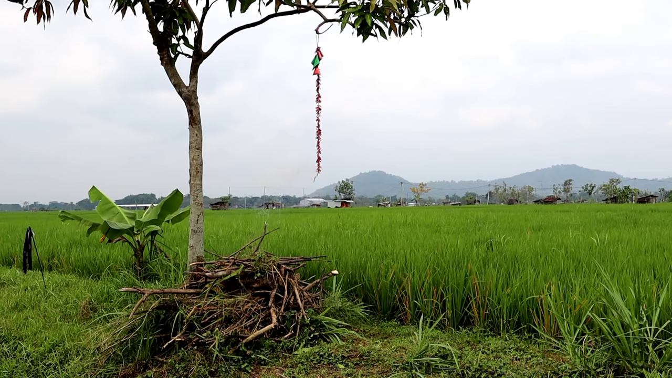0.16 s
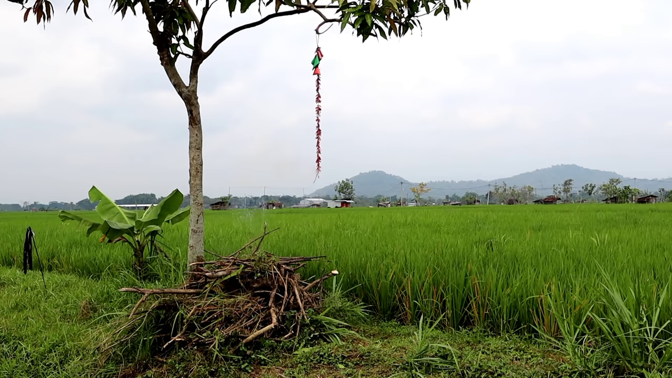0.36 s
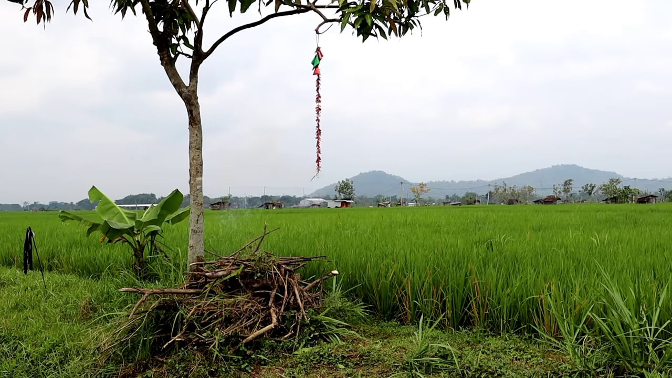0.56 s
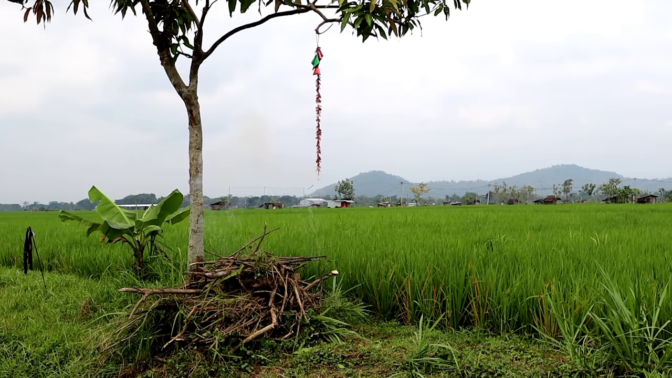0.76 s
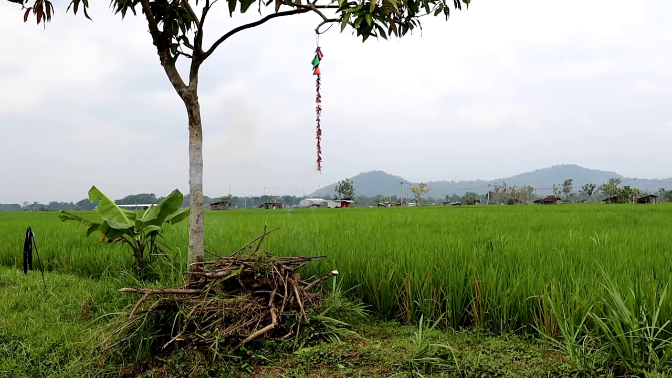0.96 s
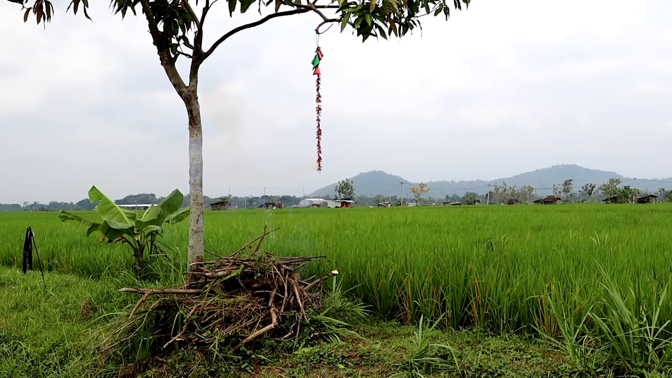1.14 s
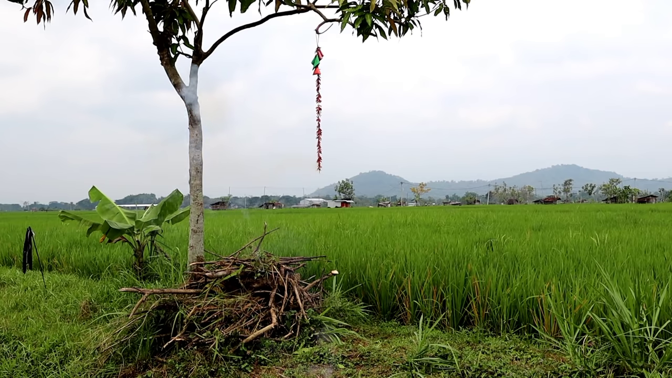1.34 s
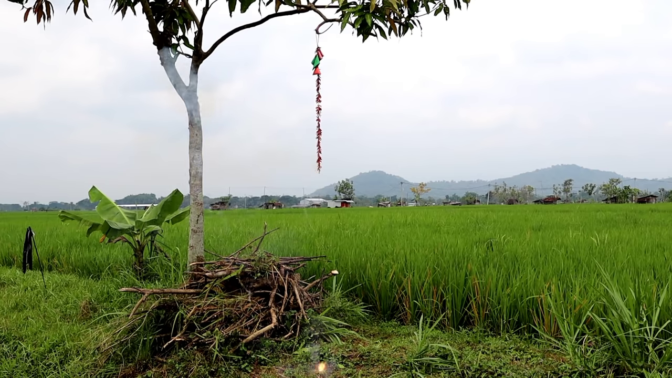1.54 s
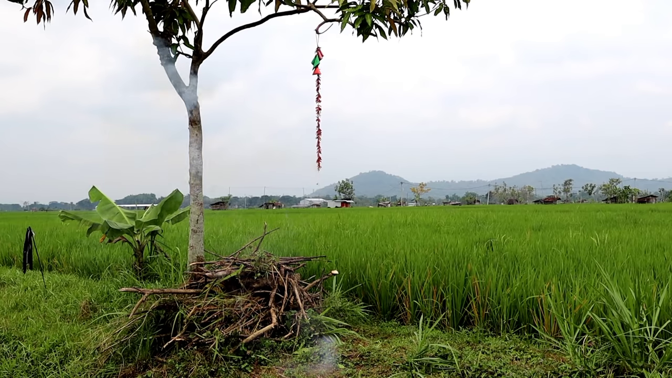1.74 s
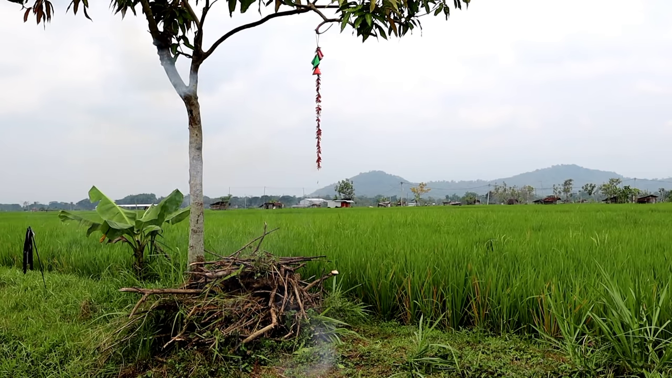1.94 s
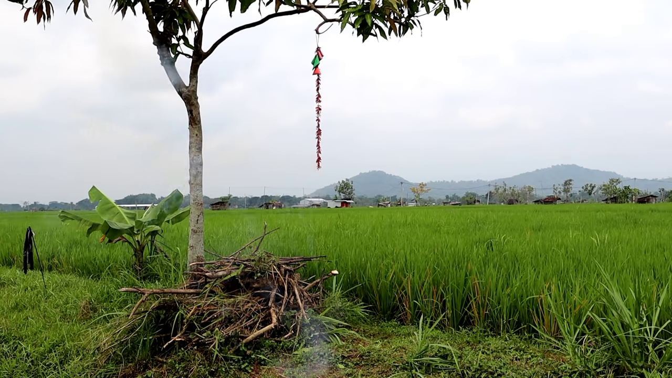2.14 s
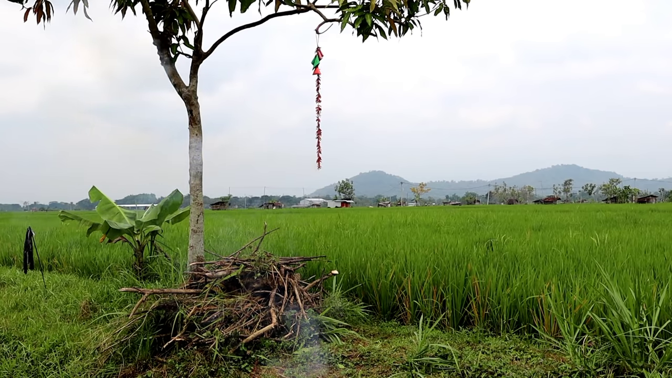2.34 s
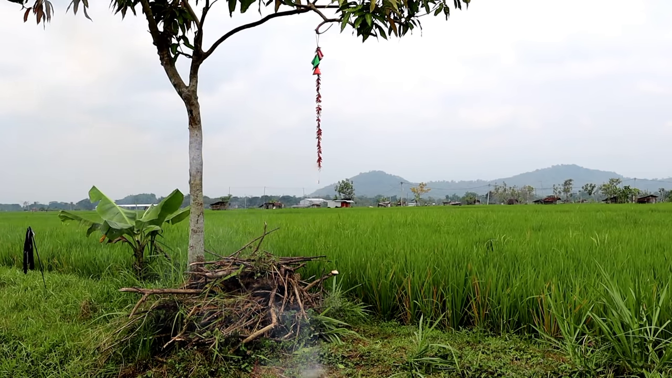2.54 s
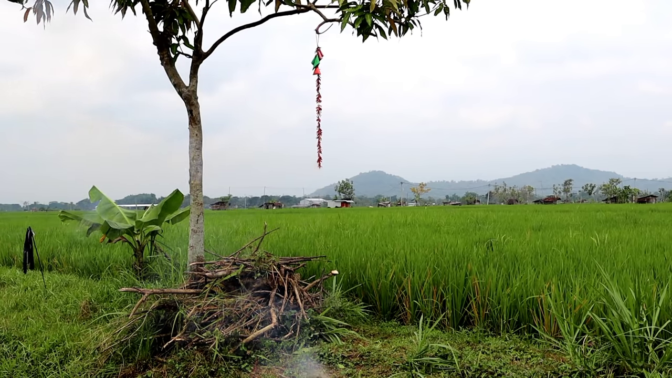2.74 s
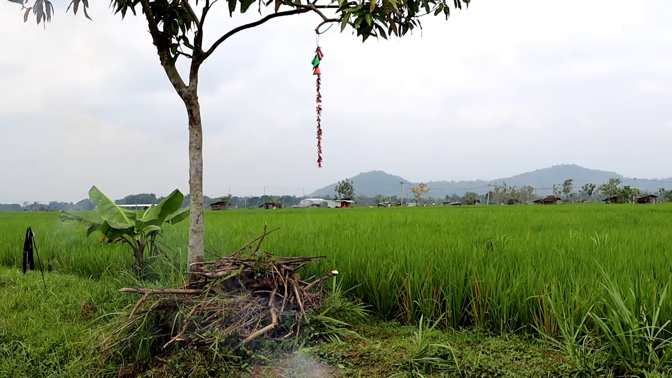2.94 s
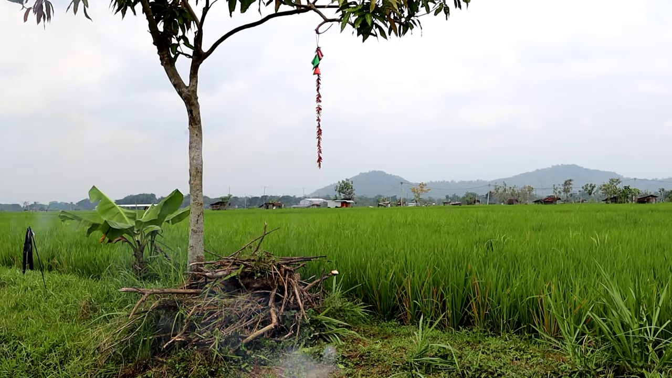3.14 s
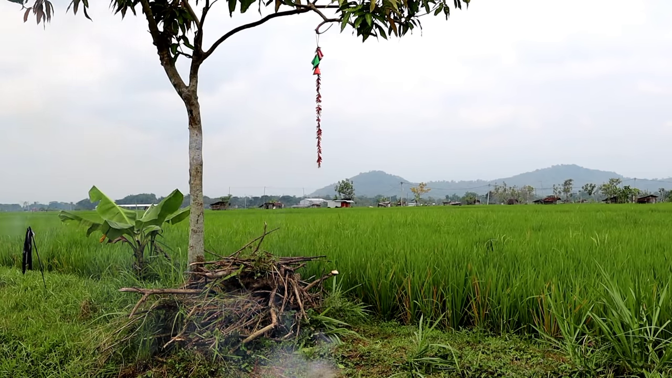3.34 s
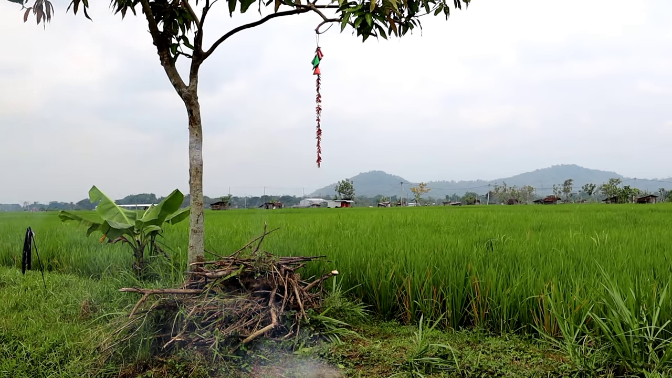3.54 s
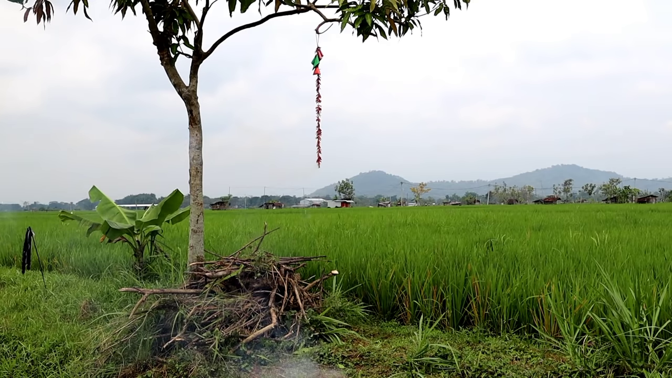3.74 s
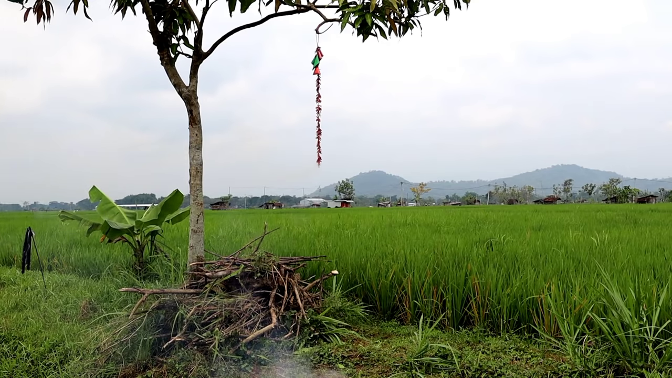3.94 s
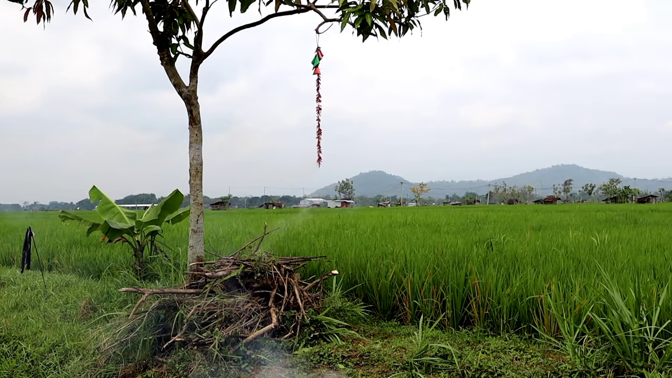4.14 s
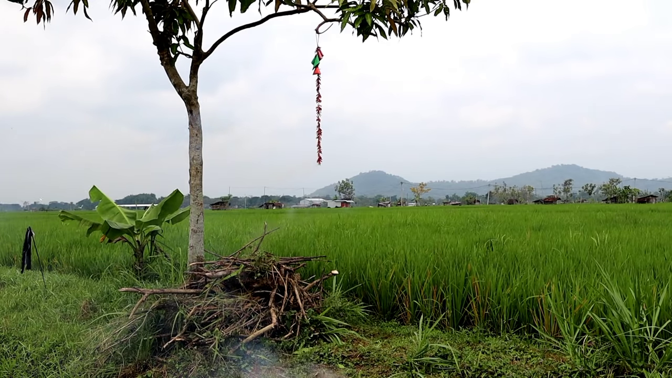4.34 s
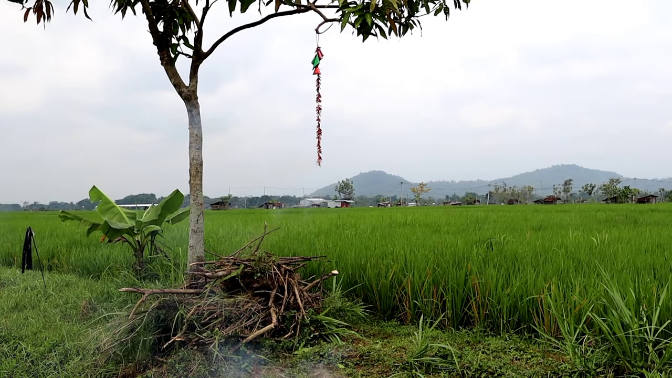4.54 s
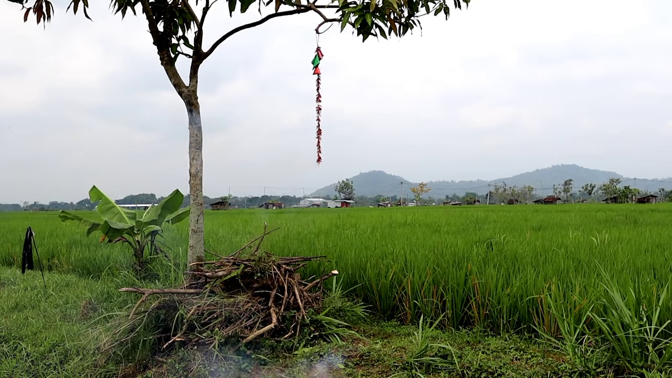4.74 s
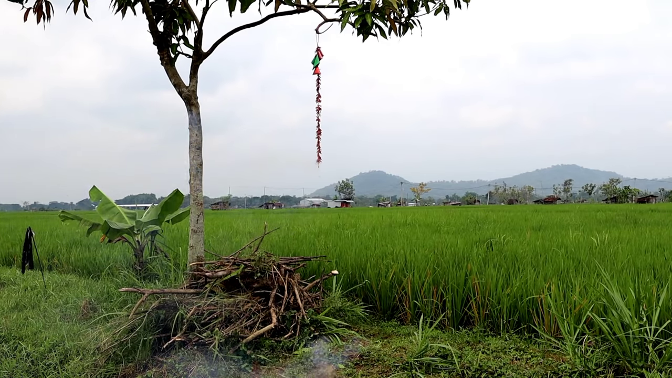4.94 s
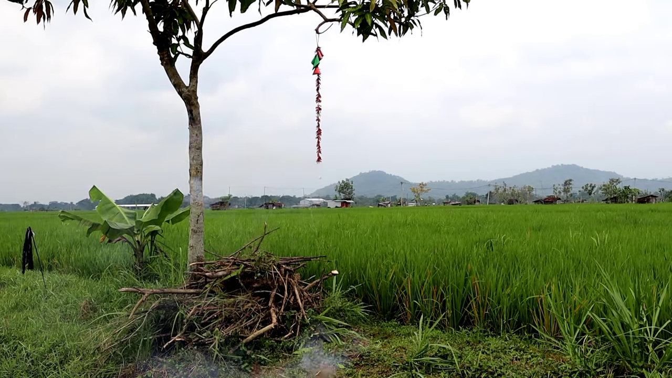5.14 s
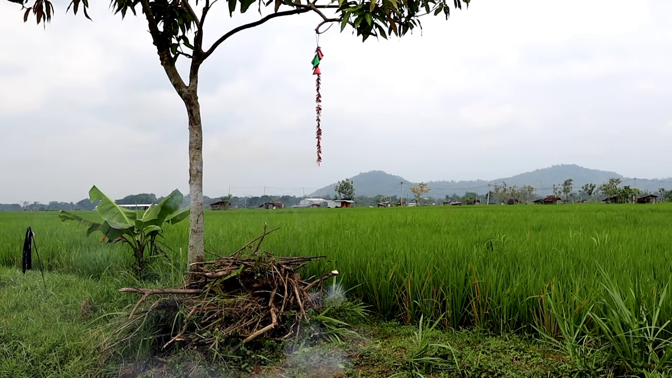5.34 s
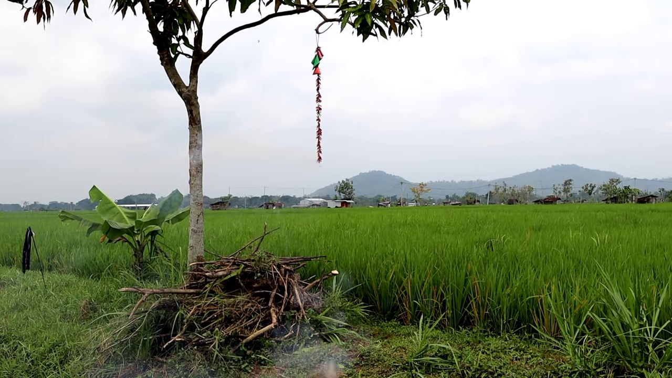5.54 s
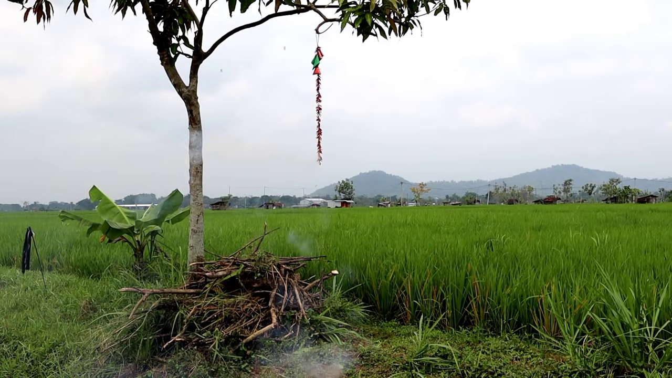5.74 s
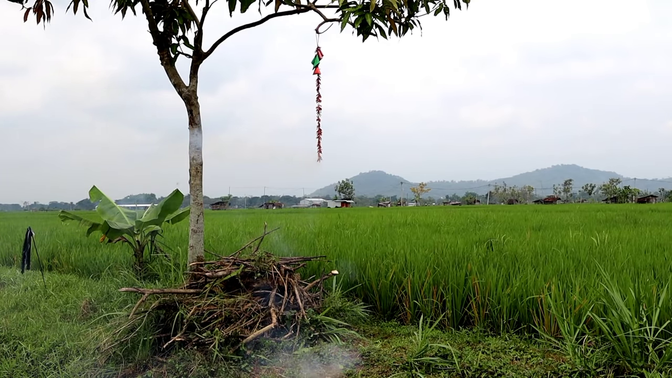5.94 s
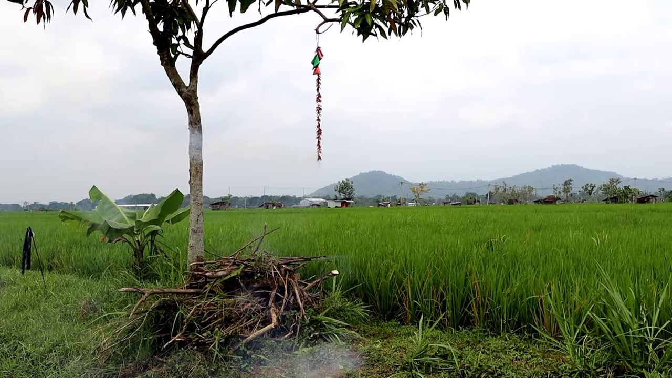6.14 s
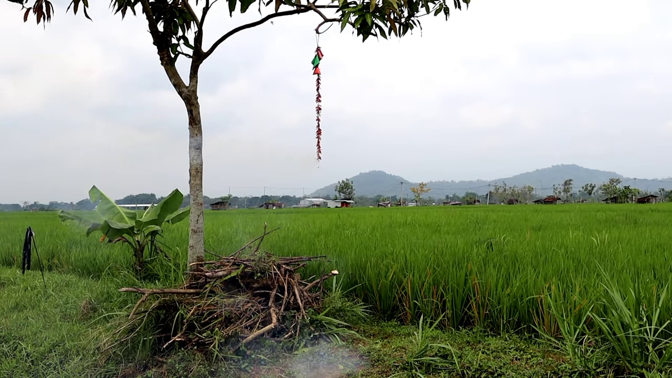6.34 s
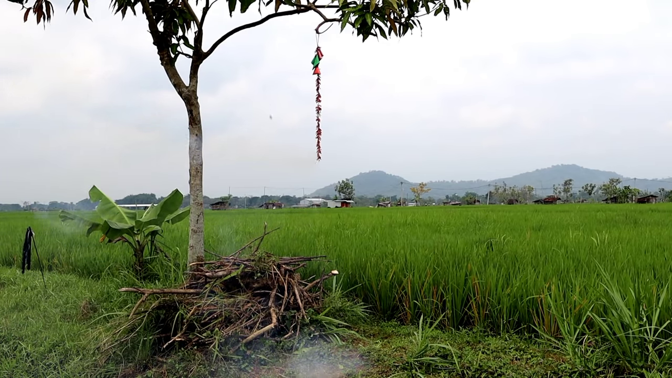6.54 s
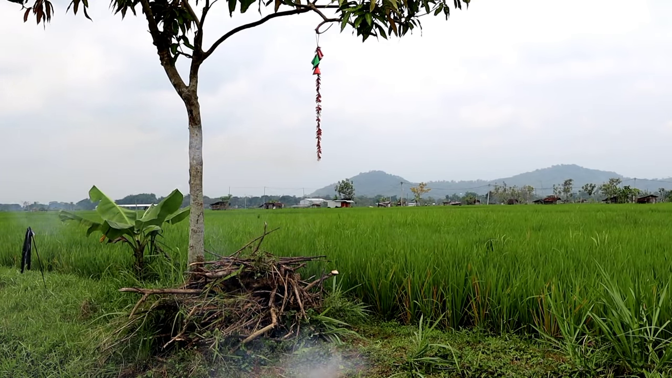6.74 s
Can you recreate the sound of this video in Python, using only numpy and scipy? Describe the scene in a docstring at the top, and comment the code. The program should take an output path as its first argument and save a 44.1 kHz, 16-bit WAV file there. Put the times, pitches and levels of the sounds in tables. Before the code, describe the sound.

A fuse hisses and sputters at a field's edge, then firecrackers burst in an irregular run of sharp, clipped cracks with short outdoor echoes.

```python
"""At the edge of a field a string of firecrackers hangs from a tree, with a microphone within overload range.
The fuse, a fluttering jet of noise, hisses and sputters; then the crackers burst in an irregular run.
Each is a short shock wave with a ground bounce; the stronger ones clip the microphone. Shaped noise makes the
scatter in the brushwood, the roll over the field and the echoes from far trees and woods. Scraps of casing land,
and behind it all lie a low outdoor rumble and the soft chugs of a distant engine."""
import sys
import numpy as np
from scipy import signal
from scipy.fft import rfft, irfft
from scipy.io import wavfile
from scipy.ndimage import uniform_filter1d

SR = 44100
rng = np.random.default_rng(int(sys.argv[2]) if len(sys.argv) > 2 else 0)


def store_pcm(level_fs):
    """Save levels as 16-bit WAV."""
    pcm = np.round(np.clip(level_fs, -1, 1) * 32767).astype(np.int16)
    wavfile.write(sys.argv[1], SR, np.atleast_2d(pcm).T)


N = 303849  # samples

# One row a cracker, each bursting at its own height: start_s, shock_db (raw shock against overload),
# blast_ms, bounce_delay_ms, around_db (sent into the surroundings), bright_db, far_echo_db, thump_db
BURSTS = [(1.353, 33, 0.18, 1.05, 6, -1, -61.5, -17), (1.3795, 14, 0.211, 1.2, -9.5, 2.5, -35.5, -19.5),
          (1.5009, 28.5, 0.11, 0.98, 2.0, 5.5, -39.5, -29.0), (1.619, 22.0, 0.22, 1.06, 4.5, 6.5, -61, -10),
          (1.6695, 16.5, 0.146, 1.15, -1, 3.5, -67, -11), (1.6805, 12, 0.18, 1.25, -7, 4.5, -34.5, -4),
          (1.8472, 24, 0.57, 1.38, 3.5, -3.5, -39, -20), (2.1676, 24, 0.14, 1.15, 4.5, -4, -46.5, -2.5),
          (2.6578, 24.5, 0.17, 1.09, 7, -8, -37.5, -25.5), (2.6648, 12, 0.32, 1.1, -6, 3.5, -41, -24),
          (2.9527, 29, 0.111, 1.144, 5.5, 0, -42.5, -34.0), (3.1943, 21.5, 0.18, 1.07, 5, 5, -39, -33.5),
          (3.305, 22, 0.29, 1.15, 5.5, -18.5, -41.5, -26), (3.3148, 9, 0.27, 1.15, -10.5, 4, -42, -17),
          (3.5847, 14.0, 0.298, 1.05, 5, -8, -63.5, -4), (3.677, 22.5, 0.12, 1.76, 2, 6, -43.5, -4),
          (4.1336, 23.5, 0.25, 0.91, 0.5, -0.5, -38.5, -21),
          (4.1365, 14.5, 0.15, 2.16, -1.5, -2, -38, -15.5), (4.3448, 18.5, 0.2, 1.09, 4, -0.5, -43, -1.0),
          (4.5552, 13.5, 0.521, 1.15, 5, -8.5, -50.5, -29.5),
          (4.8061, 26.5, 0.073, 1.22, -0.5, 6, -62, -0.5), (4.8663, 19, 0.16, 1.16, 4.0, 1.5, -49, -8.5),
          (5.0188, 14.5, 0.26, 1.16, 3.5, -3.5, -69, -25),
          (5.2147, 17.5, 0.14, 1.18, -0.5, 1.5, -53, -18.5),
          (5.2382, 12.5, 0.16, 1.05, -7, 4.5, -61.5, -6.5),
          (5.3415, 20.0, 0.11, 1.85, 1.5, 4.5, -59.5, 2.5), (5.59, 17.5, 0.14, 1.95, -1.5, 0.5, -53, 7),
          (5.6203, 6, 0.175, 0.98, -10.5, 0.5, -70.5, -25),
          (5.665, 10.5, 0.089, 1.23, -10, 9.0, -83.5, -15.0), (5.7503, 23.5, 0.092, 2.27, 6.5, 0.0, -52, 4),
          (5.8273, 13.0, 0.17, 1.11, -3, 4.0, -64.5, -13.5),
          (6.0618, 11.5, 0.507, 1.128, -2.5, -10.0, -64, -44),
          (6.1165, -2.5, 0.12, 1.43, -21.0, 2.5, -77.5, -32),
          (6.1926, 6, 0.15, 2.17, -11.5, 1.5, -67.5, -30), (6.354, 13.5, 0.17, 1.25, 2.0, -0.5, -64.5, -47),
          (6.4365, 14.5, 0.14, 1.04, -3.5, 1, -56, -10.5), (6.4969, 20.5, 0.1, 1.18, -2.5, 0.5, -77.5, -41),
          (6.7671, 15.5, 0.14, 1.12, -5, 2.0, -64, -7.5), (6.8275, 11.5, 0.15, 1.25, -6, 8.5, -62.0, -9.5),
          (6.8859, 11.5, 0.33, 1.13, -0.0, -1, -57.0, -11)]


def amp(db):
    """Turns decibels into a gain."""
    return 10 ** (np.asarray(db) / 20)


def evened(x):
    """Scales a signal to rms 1."""
    return x / np.sqrt(np.mean(x ** 2) + 1e-20)


def read(points, hz):
    """Reads a spectrum joined by straight lines on a log-frequency axis."""
    point_hz, value = np.transpose(points)
    return np.interp(np.log(hz + 1), np.log(point_hz + 1), value)


def level(curve):
    """Turns a curve of time and dB into a gain for every sample."""
    return amp(np.interp(np.arange(N) / SR, *np.transpose(curve)))


def add(mix, start_s, sound):
    """Adds a sound to the mix at its start time, cut off at the mix's end."""
    part = mix[round(start_s * SR):][:len(sound)]
    part += sound[:len(part)]


def coloured(x, spectrum, bright_db=0):
    """Gives x a spectrum at rms 1, then lifts or lowers its treble with a shelf around 2 kHz."""
    hz = np.fft.rfftfreq(len(x), 1 / SR)
    shelf = hz ** 4 / (hz ** 4 + 2000 ** 4)
    shaped = rfft(x) * amp(read(spectrum, hz))
    # the scale is taken ahead of the shelf, so brightness leaves the low band's level alone
    scale = np.std(irfft(shaped, len(x)))
    return irfft(shaped * amp(bright_db * shelf), len(x)) / scale


def lumps(size, depth_db, span):
    """A gain that wanders at random by depth_db rms, smoothed over `span` samples."""
    return amp(depth_db * evened(uniform_filter1d(rng.standard_normal(size), size=span)))


def reflections(size, spectrum, bright_db, grain_db):
    """Noise as a mass of small echoes, their strengths scattered by grain_db."""
    strength = amp(grain_db * rng.standard_normal(size))
    return coloured(rng.standard_normal(size) * strength, spectrum, bright_db)


def crackers():
    """Sums every burst with its ground bounce, torn casing, scatter, roll, echoes and thump."""
    pile_s, pile_db = 0.0093, -30  # one firm reflection from the stick pile, against the blast
    # scatter and roll keep a fixed balance against what a cracker sends into the surroundings
    brush_db, roll_db = -27, -42.5
    out = np.zeros(N)
    puff = thump()
    for start, shock_db, blast_ms, bounce_ms, around_db, bright_db, far_db, thump_db in BURSTS:
        direct = amp(shock_db) * blast(blast_ms, bounce_ms)
        add(out, start, direct)
        add(out, start + pile_s, amp(pile_db) * direct)
        add(out, start, amp(shock_db) * casing())
        add(out, start, amp(brush_db + around_db) * brushwood(bright_db))
        add(out, start, amp(roll_db + around_db) * field(bright_db))
        add(out, start, amp(far_db) * far_trees(bright_db, blast_ms))
        add(out, start, amp(far_db) * woods())
        add(out, start, amp(thump_db) * puff)
    return out


def blast(blast_ms, bounce_ms, bounce_db=-5, low_cut_hz=310, damping=1.87, soil_hz=9000, size=2048):
    """A shock (1 - u) exp(-u) and its soil-dulled bounce, through the microphone's band, polarity inverted."""
    s = 2j * np.pi * np.fft.rfftfreq(size, 1 / SR)
    length, delay = blast_ms / 1000, bounce_ms / 1000  # s
    shock = -SR * s * length ** 2 / (1 + s * length) ** 2
    soil = 1 / (1 + s / (2 * np.pi * soil_hz))
    ground = 1 + amp(bounce_db) * np.exp(-s * delay) * soil
    # the shock front's treble limit falls as the blast gets longer: 6400 Hz at the usual 0.2 ms
    front_hz = 6400 * (0.2 / blast_ms) ** 0.33
    w = 2 * np.pi * low_cut_hz
    low_cut = s ** 2 / (s ** 2 + damping * w * s + w ** 2)
    front = 1 / (1 + s / (2 * np.pi * front_hz)) ** 2
    # the microphone's opening has a dip and two resonances
    port = 1 - 0.32 * band(s, 1634, quality=5.2)
    port = port + 0.5 * band(s, 3620, quality=9.3) + 0.66 * band(s, 5000, quality=3.3)
    return irfft(shock * ground * low_cut * front * port)[:size // 2]


def band(s, hz, quality):
    """A resonance of gain 1 at hz."""
    w = 2 * np.pi * hz
    return s * w / quality / (s ** 2 + s * w / quality + w ** 2)


def casing(tear_db=-27, decay_s=0.00028, size=512):
    """The paper tube tears apart: a burst of noise puts a ragged, bright edge on the shock."""
    # torn paper's spectrum: frequency_hz, level_db
    tear_spectrum = [(500, -21), (1500, -18.5), (3600, -11), (6000, -9.5), (9000, 14.5), (16000, -6)]
    t = np.arange(size) / SR
    return amp(tear_db) * coloured(rng.standard_normal(size), tear_spectrum) * np.exp(-t / decay_s)


def thump():
    """A low thump, less a weaker and slower swing back the other way."""
    puff_s, recovery_s, recovery_db = 0.0013, 0.0034, -27
    return push(puff_s) - amp(recovery_db) * push(recovery_s)


def push(length_s, size=4096):
    """A swing of pressure with a softened start and a weak rebound."""
    u = np.arange(size) / SR / length_s
    return (1 - np.exp(-u * 7)) * (1 - u) * np.exp(-u)


def brushwood(bright_db, size=4096):
    """Grass answers within milliseconds; the stick pile and the tree scatter for some 20 ms more."""
    # brushwood's spectrum: frequency_hz, level_db
    brush_spectrum = [(100, -8), (350, -13.5), (520, 2), (760, -5), (1200, -5), (1550, -3), (2000, -8.5),
                      (3000, -6.5), (3700, -0.5), (4300, -11.5), (5600, -10), (6800, -15.5), (11000, -18),
                      (16000, -27)]
    t = np.arange(size) / SR
    grass = amp(17.5) * np.exp(-t / 0.0018)
    sticks = amp(5.5) * np.exp(-t / 0.021) / np.sqrt(1 + (t / 0.019) ** 8)
    onset = 1 - np.exp(-t / 0.0021)
    return reflections(size, brush_spectrum, bright_db, grain_db=8.0) * (grass + sticks) * onset


def field(bright_db, size=16384):
    """The roll over the crop: uneven in the lows, while the treble dies sooner."""
    # the roll's spectrum: frequency_hz, level_db
    field_spectrum = [(80, -23.5), (200, -11), (400, -4.5), (800, -2), (1450, 0.5), (2000, -7.5),
                      (3000, -8), (3650, -6.5), (4300, -12.5), (5600, -10.5), (7000, -21), (16000, -26.5)]
    t = np.arange(size) / SR
    roll = reflections(size, field_spectrum, bright_db + 5.5, grain_db=4)
    low = signal.sosfilt(signal.butter(1, 2500, fs=SR, output="sos"), roll)
    # 60 dB down after 0.34 s in the lows and 0.22 s in the treble
    low_tail = low * lumps(size, depth_db=2, span=220) * amp(-60 * t / 0.34)
    treble_tail = (roll - low) * amp(-60 * t / 0.22)
    return amp(9) * (low_tail + treble_tail) * (1 - np.exp(-t / 0.0059))


def far_trees(bright_db, blast_ms, delay_s=0.095, spread=0.35, size=16384):
    """A dull echo from a line of trees, arriving in uneven slaps; a longer blast returns a deeper echo."""
    # the tree line's spectrum: frequency_hz, level_db
    far_spectrum = [(80, -20.5), (250, -12.5), (500, 0), (800, -2.5), (1400, -3.5), (2100, -10),
                    (3700, -5.5), (5500, -14), (7500, -9.5), (16000, -38)]
    t = (np.arange(size) + 1) / SR
    swell = np.exp(-(np.log(t / delay_s) / spread) ** 2 / 2)
    slaps = lumps(size, depth_db=3, span=250)
    trunk = 0.7 * np.exp(-((t - 0.115) / 0.00082) ** 2)  # one firm return stands out
    # the treble corner is 600 Hz for a 1 ms blast, higher for shorter ones
    depth = signal.butter(2, min(600 / blast_ms, SR / 3), fs=SR, output="sos")
    returns = reflections(size, far_spectrum, bright_db + 1.5, grain_db=5.5)
    echo = evened(signal.sosfilt(depth, returns) * slaps)
    return amp(1.0) * echo * (swell + trunk)


def woods(delay_s=0.21, spread=0.25, woods_db=-13.5, size=24000):
    """Distant woods across the field send back a late, low murmur in one slow swell."""
    # the woods' spectrum: frequency_hz, level_db
    woods_spectrum = [(100, -22), (250, -6.5), (400, 1.5), (600, -3), (1000, -19), (16000, -72)]
    t = (np.arange(size) + 1) / SR
    swell = np.exp(-(np.log(t / delay_s) / spread) ** 2 / 2)
    return amp(woods_db) * coloured(rng.standard_normal(size), woods_spectrum) * swell


def fuse():
    """A slightly fluttering jet of gas, as shaped noise, with its sputtering flares."""
    # the burning fuse's spectrum: frequency_hz, level_db
    fuse_spectrum = [(200, -24.5), (430, -10.5), (650, -3), (1100, -4), (1400, 1.5), (1750, -5),
                     (3100, -3.5), (3600, 0.5), (4500, -8.5), (5300, -1.5), (6300, -10), (8000, -12.5),
                     (11500, -10), (16000, -18)]
    # the hiss up to the first cracker and as it flares again, ahead of the fade: time_s, level_db
    hiss_curve = [(0, -56), (.3, -48), (.7, -47), (1.02, -44), (1.25, -49), (1.7, -51.5), (2.2, -48),
                  (3.1, -47.5)]
    jet = reflections(N, fuse_spectrum, 0, grain_db=0.0)
    hiss = jet * lumps(N, depth_db=0.97, span=900) * level(hiss_curve)
    return hiss + sputter()


def sputter(sparks_per_s=350):
    """Each flare is a fizz of fine random sparks with a quick, uneven run of spits."""
    # the fuse's flare-ups: start_s, length_s, level_db (ahead of the fade)
    flare_rows = [(.35, 0.14, -47), (0.61, 0.022, -46.5)]
    # spectrum of sparks and spits: frequency_hz, level_db
    spit_spectrum = [(200, -3), (600, -8), (1300, 2), (2200, -8), (4000, -13), (16000, -53)]
    rise_s, fall_s = 0.017, 0.069
    spit_gap_s, spit_db = 0.0115, 12  # mean gap; level above the flare's
    sparks = (rng.random(N) < sparks_per_s / SR) * rng.uniform(.4, 1, N)
    flame, spits, t = np.zeros(N), [], np.arange(SR) / SR
    for start, length, db in flare_rows:
        rise = np.minimum(t / rise_s, 1)
        fall = np.exp(-np.maximum(t - length, 0) / fall_s)
        add(flame, start - rise_s, amp(db) * rise * fall)
        gap, strength = rng.uniform(-1, 1, (2, 32))
        delays = np.cumsum(spit_gap_s * (1 + .5 * gap))
        for delay, z in zip(delays, strength):
            if delay < length:
                spits.append((start + delay, db + spit_db + 3.0 * z))
    return coloured(sparks, spit_spectrum) * flame + ticks(spits, spit_spectrum, decay_s=0.0014)


def ticks(rows, spectrum, decay_s, size=2048):
    """Short dry snaps of decaying noise."""
    out, t = np.zeros(N), np.arange(size) / SR
    for start, db in rows:
        add(out, start, amp(db) * coloured(rng.standard_normal(size), spectrum) * np.exp(-t / decay_s))
    return out


def scraps():
    """Scraps of casing land, each a dry snap."""
    # landings: start_s, level_db
    landings = [(2.004, -34), (4.4855, -44), (6.307, -50)]
    # a scrap's spectrum: frequency_hz, level_db
    scrap_spectrum = [(300, -33), (1500, -34), (4000, 7.5), (6000, -2.5), (9000, -8.5), (16000, -13)]
    return ticks(landings, scrap_spectrum, decay_s=.004)


def pump_engine(second_beat_s=0.036, second_db=-2, engine_db=-52):
    """A slow engine far off, perhaps a water pump: two soft chugs, as decaying tones, in every cycle."""
    # the distant engine's spectrum: frequency_hz, level_db
    chug_spectrum = [(20, -21), (60, -5.5), (120, 3), (190, -2.5), (290, -0.5), (400, -13), (900, -33.5),
                     (16000, -100)]
    period_s, first_s, ring_s = .1352, -.019, .0035
    beats = np.zeros(N)
    t = np.arange(1024) / SR
    for cycle in np.arange(first_s, N / SR, period_s):
        for start, db in ((cycle, 0), (cycle + second_beat_s, second_db)):
            pitch_hz = 165 * rng.uniform(1.0, 1.34)
            chug = np.sin(2 * np.pi * pitch_hz * t) * np.exp(-t / ring_s)
            if start > 0:
                add(beats, start, amp(db + 1.5 * rng.standard_normal()) * chug)
    return coloured(beats, chug_spectrum) * amp(engine_db)


def rumble(rumble_db=-52.5):
    """Low outdoor background of steady shaped noise."""
    # the open air's spectrum: frequency_hz, level_db
    rumble_spectrum = [(20, -15), (45, -9), (75, 6), (130, -2.5), (190, 2), (300, -4.5), (450, -11.5),
                       (900, -17), (2500, -36), (16000, -69.5)]
    return amp(rumble_db) * coloured(rng.standard_normal(N), rumble_spectrum)


def dips(dip_db=-8.5, recovery_s=0.11):
    """A gain that drops at each bang and recovers exponentially in dB; close bangs add up."""
    db, t = np.zeros(N), np.arange(SR) / SR
    for start, *_ in BURSTS:
        add(db, start, dip_db * np.exp(-t / recovery_s))
    return amp(db)


def fade(from_s=1.55, db_per_s=5):
    """A gain that holds steady, then falls at a constant rate once the bangs are under way."""
    return amp(-db_per_s * np.maximum(np.arange(N) / SR - from_s, 0))


def scene():
    """The crackers over the falling scraps, the fuse and the low background; the last two fade."""
    background = (pump_engine() + rumble()) * dips()
    quiet = (fuse() + background) * fade()
    return (crackers() + scraps() + quiet)[None]


def record(dry, edge_hz=15600):
    """The microphone's overload clips the blasts flat; a low-pass then limits the band."""
    clipped = np.clip(dry, -1, 1)
    low_pass = signal.firwin(383, edge_hz, window=("kaiser", 7), fs=SR)
    return signal.oaconvolve(clipped, low_pass[None], "same")


dry = scene()
out = record(dry)
store_pcm(out)
```